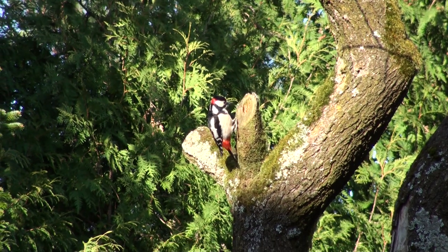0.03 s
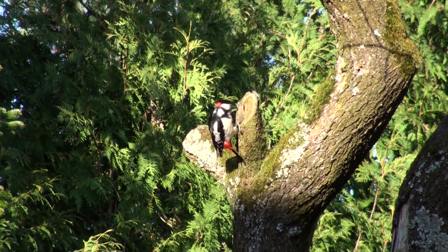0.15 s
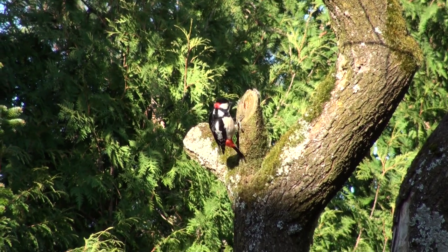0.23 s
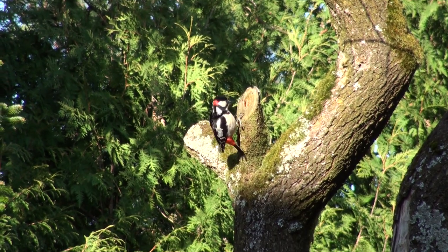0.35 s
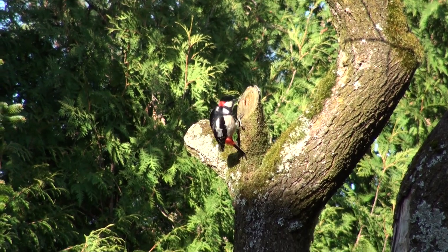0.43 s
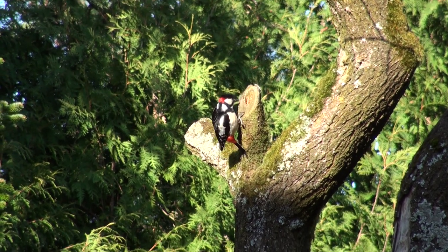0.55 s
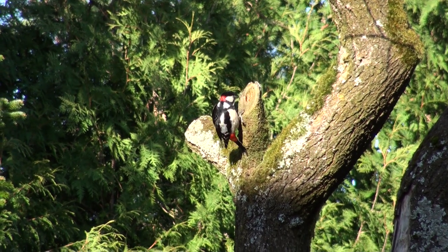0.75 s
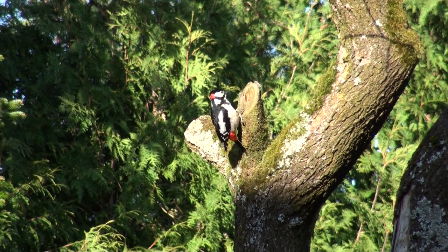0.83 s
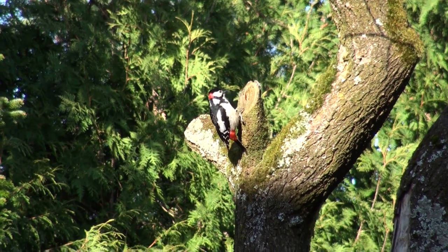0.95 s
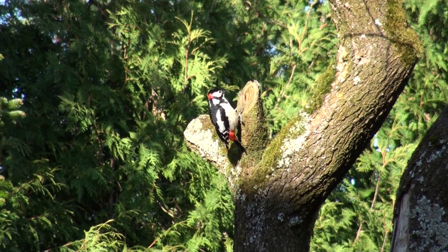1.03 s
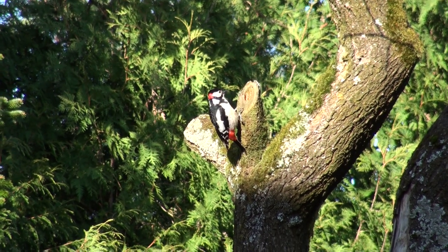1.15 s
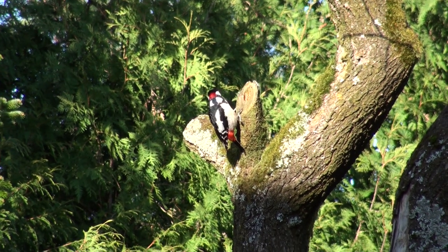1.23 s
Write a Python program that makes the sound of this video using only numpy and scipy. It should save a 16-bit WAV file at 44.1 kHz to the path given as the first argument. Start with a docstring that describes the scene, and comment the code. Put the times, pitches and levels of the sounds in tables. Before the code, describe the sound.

In a quiet forest, a far bird's thin whistle fades, then a woodpecker's rapid, slightly accelerating knocks ring out and weaken at the end; reverberation trails off and another high falling whistle follows over faint air noise.

```python
"""Low rumble and soft hiss lie under the whole scene; a far songbird's thin falling whistle is heard first.
A woodpecker then drums fourteen quickening knocks on a dead branch stub in a quiet wood.
Each blow swells and rings the stub's modes as decaying sines, with noise bursts for grain and beak tick.
Delayed copies echo from nearby trunks, and decaying noise responses make the forest ring on.
A second falling whistle, a swept sine like the first, follows the roll."""
import sys
import numpy as np
from scipy import signal
from scipy.fft import rfft, irfft
from scipy.io import wavfile
from scipy.ndimage import uniform_filter1d

SR = 44100
rng = np.random.default_rng(int(sys.argv[2]) if len(sys.argv) > 2 else 0)


def waveform_to_disk(signal):
    """Save audio, clipped to [-1, 1], as 16-bit WAV at the path in sys.argv[1]."""
    frames = np.transpose(np.atleast_2d(signal))
    scaled = np.clip(frames, -1, 1) * 32767
    samples = np.round(scaled).astype(np.int16)
    wavfile.write(sys.argv[1], SR, samples)


N = 57330


def undb(db):
    """Decibels to amplitude gain."""
    return 10 ** (np.asarray(db) / 20)


def colour(x, points):
    """Zero-phase filter by a curve of (frequency [Hz], level [dB]) points, joined on a log frequency axis."""
    hz, db = np.array(points, float).T
    f = np.maximum(np.fft.rfftfreq(2 * N, 1 / SR), 1)
    gain = undb(np.interp(np.log(f), np.log(hz), db))
    return irfft(rfft(x, 2 * N) * gain)[..., :N]


def noise(points):
    """Coloured Gaussian noise of rms 1."""
    x = colour(rng.standard_normal(N), points)
    return x / x.std()


def walk(rate):
    """Smooth chance with a spread near 1: random levels, about rate per second, joined by ramps."""
    k = int(SR / rate)
    steps = np.repeat(rng.standard_normal(N // k + 1), k)
    return 1.3 * uniform_filter1d(steps, k)[:N]


def envelope(t, swell, t60):
    """A quick swell of linearly rising power, then an exponential decay by 60 dB in t60."""
    rise = np.sqrt(np.clip(t / swell, 0, 1))
    return rise * np.exp(-np.log(1000) * np.maximum(t - swell, 0) / t60)


def pan(db):
    """Left and right gains for a level difference, left louder when positive."""
    return undb(np.array([[db], [-db]]) / 2)


def stereo(mid, side):
    """Mid and side to left and right."""
    return np.array([mid + side, mid - side])


def convolve(x, response):
    """Pass a sound through an impulse response."""
    return signal.fftconvolve(np.atleast_2d(x), np.atleast_2d(response), axes=-1)[:, :N]


def woodpecker():
    """Every blow rings the same modes; glancing blows keep the thump but lose the ring."""
    # blows of the beak: (time [s], thump [dB], main ring [dB], upper ring [dB], tick [dB])
    knocks = [(0.2119, -4.5, -13.5, -11.3, -16.5), (0.2731, -1.2, -2, -2, -15),
              (0.3292, -0.5, -2, -6.5, -1.5), (0.3828, -0.3, 0.1, -0.5, -11), (0.4358, -0.8, -1.3, 0.5, -9),
              (0.4872, -0.1, 0.5, 2.5, -8), (0.5359, 0, 0.2, 1, -9), (0.5858, 0.5, 0.2, 1.3, -3.5),
              (0.6332, -1, -35, -7.5, -13.5), (0.6787, -2.5, -3.5, -10.0, -14),
              (0.7218, -0.7, -2, -3.5, -8.5), (0.7656, -2, -3.5, -5.5, -12), (0.8066, -2.5, -8, -5.5, -14),
              (0.8472, -3, -7.0, -9, -17.5)]
    # modes of the stub: (frequency [Hz], level before the blow's force [dB], swell [s], t60 [s])
    stub = [(353.8, -45.5, 0.0076, 0.04), (408, -55, 0.026, 0.43), (480.7, -54, 0.016, 0.16),
            (668, -47, 0.013, 0.046), (1183, -38.5, 0.00354, 0.036), (1327.7, -42.5, 0.0096, 0.037),
            (1514, -40.5, 0.0066, 0.029), (1681.3, -37.5, 0.0024, 0.047), (1760.5, -26, 0.00516, 0.0069),
            (2210, -41.5, 0.00051, 0.0039), (2897, -38.5, 0.0018, 0.025), (3038, -39.5, 0.0019, 0.025),
            (3190, -56, 0.0034, 0.03)]
    # colour of the wood's many weak modes: (frequency [Hz], level [dB])
    grain_colour = [(100, -22), (220, -33), (300, -3), (450, -5), (600, 0.5), (800, -4), (950, -7.5),
                    (1150, 1.5), (1400, 4.5), (2000, -14.5), (2500, -6.5), (3300, -10), (4000, -25.5),
                    (5000, -37.5)]
    # colour of the beak tip's tick: (frequency [Hz], level [dB])
    tick_colour = [(2000, -4), (3500, -3), (4100, -9.5), (4700, -1.5), (5500, 1.5), (6400, 0.5), (7300, -6),
                   (7900, -5), (9000, -11.5), (10000, -32), (12000, -16), (16000, -48)]
    ring_from_hz, upper_from_hz = 1420, 2100  # lower modes follow the thump
    pan_db, ring_pan_db = 0.5, 1.7  # left over right, for modes up to and above 1000 Hz
    grain_db, grain_swell_s, grain_t60_s = -43.5, 0.0069, 0.059
    tick_db, tick_swell_s, tick_t60_s = -40, 0.00027, 0.022

    t = np.arange(N) / SR
    out = np.zeros((2, N))
    grain = undb(grain_db) * stereo(noise(grain_colour), 0.29 * noise(grain_colour))
    tick = undb(tick_db) * stereo(noise(tick_colour), 0.22 * noise(tick_colour))
    for start, thump_force_db, ring_force_db, upper_force_db, tick_force_db in knocks:
        i = int(start * SR)
        span = slice(i, i + SR // 3)
        age = t[span] - start
        for hz, db, swell, t60 in stub:
            if hz < ring_from_hz:
                force_db = thump_force_db
            elif hz < upper_from_hz:
                force_db = ring_force_db
            else:
                force_db = upper_force_db
            place = pan(ring_pan_db if hz > 1000 else pan_db)
            mode = envelope(age, swell, t60) * np.sin(2 * np.pi * hz * age)
            out[:, span] += place * undb(db + force_db) * mode
        grain_env = envelope(age, grain_swell_s, grain_t60_s)
        out[:, span] += undb(thump_force_db) * grain[:, span] * grain_env
        tick_env = envelope(age, tick_swell_s, tick_t60_s)
        out[:, span] += undb(tick_force_db) * tick[:, span] * tick_env
    return out


def scatter(x, onset, t60):
    """Diffuse reflections from trunks and foliage: a decaying noise response, its mid near unit energy."""
    env = envelope(np.arange(N) / SR, onset, t60)
    mid, side = rng.standard_normal((2, N)) * env / np.linalg.norm(env)
    return convolve(x, stereo(mid, 0.29 * side))  # the side sets the forest's width


def forest(x):
    """Dulled echoes from trunks on alternate sides, a bright scatter from foliage and the wood's long tail."""
    # echoes from nearby trunks: (delay [s], level before dulling and placing [dB])
    echoes = [(.00761, -15), (.01397, -16.5), (.01979, -14.5), (.02773, -14), (.03327, -15.5),
              (.0505, -28.5)]
    # colour of the quick scatter from nearby foliage: (frequency [Hz], level [dB])
    foliage_colour = [(100, -11), (350, 7.5), (700, -1), (1200, -11), (1800, -10), (2400, -1), (3000, -2),
                      (4200, 15), (6000, 12), (8500, 12.5), (11000, -4), (16000, -6)]
    # colour of the forest's long reverberation: (frequency [Hz], level [dB])
    tail_colour = [(100, -17), (330, 3.5), (700, -5.5), (950, 6.5), (1200, -2), (1800, -2), (2400, 5.5),
                   (3000, -6), (4300, 9), (6000, -5.5), (9000, -3), (16000, -12)]
    echo_dull_hz, echo_spread = 3760, 0.31  # 6 dB down at this frequency; side gain
    early_db, early_onset_s, early_t60_s = -19.5, 0.01, 0.16
    late_db, late_onset_s, late_t60_s = -8, 0.058, 0.69

    f = np.fft.rfftfreq(2 * N, 1 / SR)
    paths = 0
    for k, (delay, db) in enumerate(echoes):
        place = stereo(0.93, (-1) ** k * echo_spread)[:, None]
        paths = paths + undb(db) * place * np.exp(-2j * np.pi * f * delay)  # a delay is a phase slope
    dulling = 1 + (f / echo_dull_hz) ** 4
    trunks = irfft(rfft(x, 2 * N) * paths / dulling)[:, :N]
    leaves = undb(early_db) * scatter(colour(x, foliage_colour), early_onset_s, early_t60_s)
    tail = undb(late_db) * scatter(colour(x, tail_colour), late_onset_s, late_t60_s)
    return trunks + leaves + tail


def songbird():
    """Thin whistles, wavering sines that fall ever faster, blurred by distance."""
    # far whistles: (start [s], length [s], first pitch [Hz], fall [Hz], level before distance [dB])
    whistles = [(-.06, .25, 7800, 2400, -80), (1.125, .21, 7780, 2900, -72)]
    bend, waver = 1.9, 0.028  # exponent of the fall; pitch spread as a fraction
    direct_db, blur_onset_s, blur_t60_s = -7, 0.0042, 0.2

    t = np.arange(N) / SR
    out = np.zeros(N)
    for start, length, hz, fall_hz, db in whistles:
        u = np.clip((t - start) / length, 0, 1)  # progress through the whistle
        pitch = (hz - fall_hz * u ** bend) * (1 + waver * walk(400))
        swell = np.sqrt(np.abs(np.sin(np.pi * u)))
        out += undb(db) * swell * np.sin(2 * np.pi * np.cumsum(pitch) / SR)
    return undb(direct_db) * out + scatter(out, blur_onset_s, blur_t60_s)


def air():
    """Distant rumble and smooth hiss as coloured noise; a share, larger in the bass, wavers and slowly grows."""
    # spectrum of the background: (frequency [Hz], level per hertz [dB])
    air_colour = [(12, -54), (20, -13.5), (68, 0), (146, -5.5), (172, -15.5), (204, -11.5), (301, -10.5),
                  (328, -8.5), (410, -16), (446, -14), (574, -12), (1860, -23), (2460, -24), (5380, -31),
                  (7520, -32.5), (8180, -34), (16000, -34)]
    # width of the background: (frequency [Hz], side minus mid [dB])
    side_colour = [(60, -64), (125, -20), (500, -7), (2000, 1), (8000, -1), (10000, -2), (12000, -18)]
    air_db = -59
    waver_db, rise_db_per_s = 1.5, 3.0  # both act on the moving share alone

    bed = stereo(noise(air_colour), colour(noise(air_colour), side_colour))
    moving = colour(bed, [(500, -9), (3000, -13)])
    from_middle_s = (np.arange(N) - N / 2) / SR
    swell_db = waver_db * walk(6.64) + rise_db_per_s * from_middle_s
    return undb(air_db) * (bed + moving * (undb(swell_db) - 1))


def scene():
    """The drum roll in its forest, with the far bird and the background."""
    drum = woodpecker()
    return drum + forest(drum) + songbird() + air()


def record(dry):
    """The recorder cuts the top with a steep elliptic low-pass."""
    top_hz = 16400
    low_pass = signal.ellip(10, 0.1, 70, top_hz, fs=SR, output="sos")  # order, ripple dB, stopband dB
    return signal.sosfilt(low_pass, dry)


dry = scene()
out = record(dry)
waveform_to_disk(out)
```